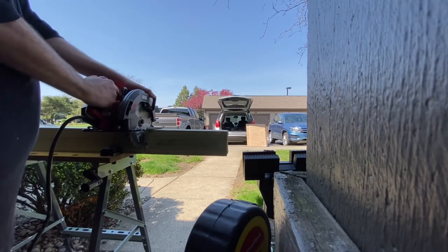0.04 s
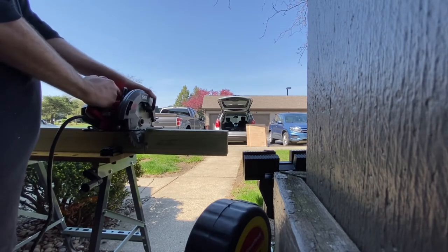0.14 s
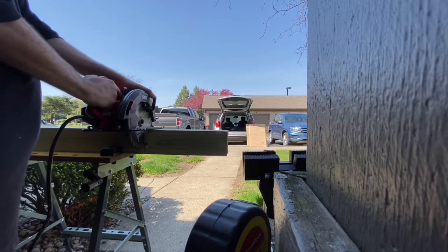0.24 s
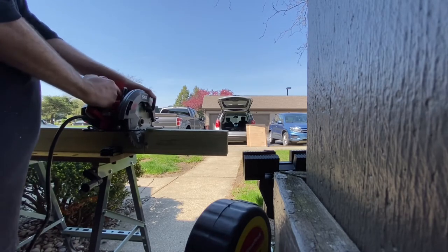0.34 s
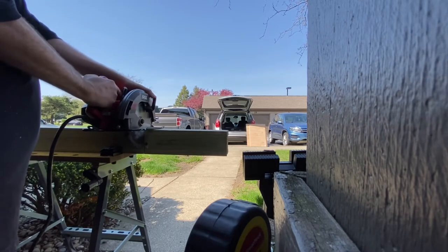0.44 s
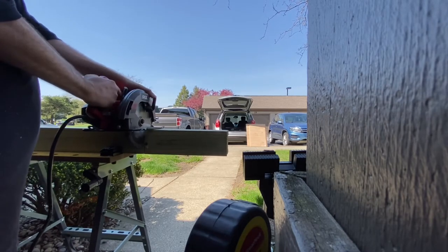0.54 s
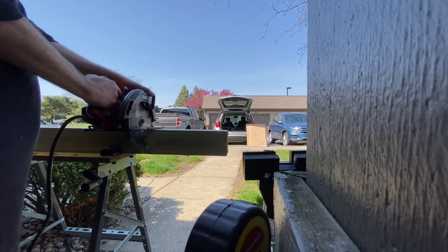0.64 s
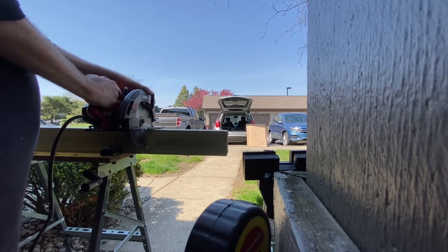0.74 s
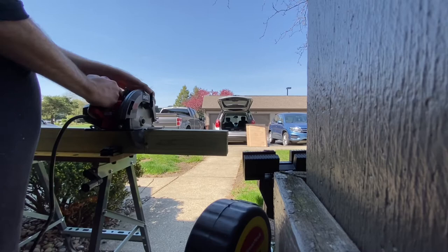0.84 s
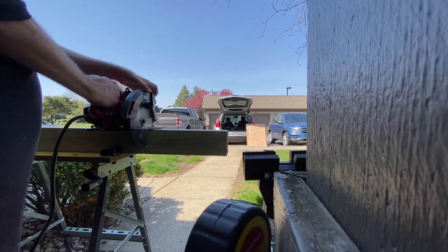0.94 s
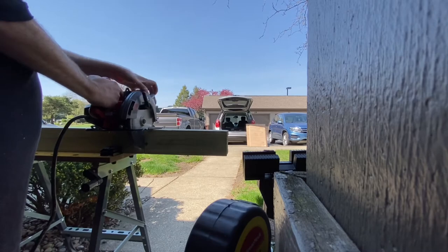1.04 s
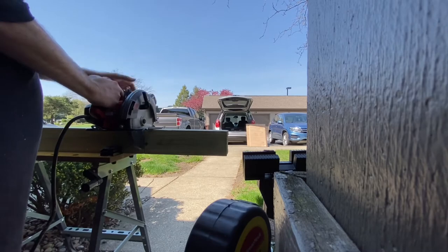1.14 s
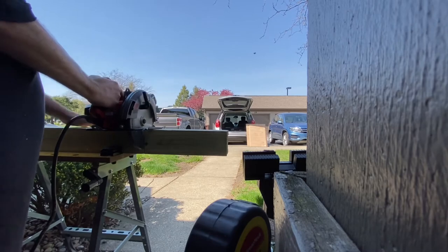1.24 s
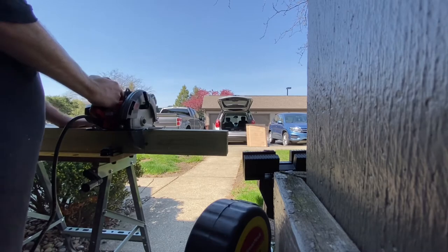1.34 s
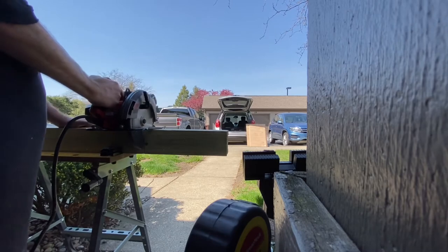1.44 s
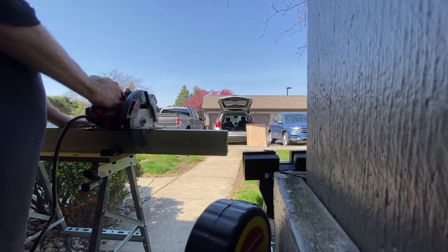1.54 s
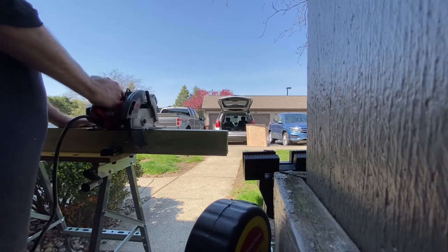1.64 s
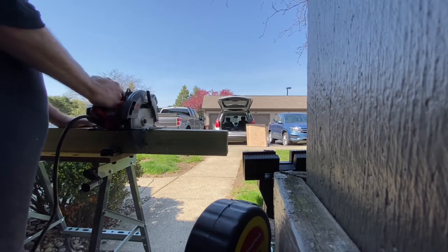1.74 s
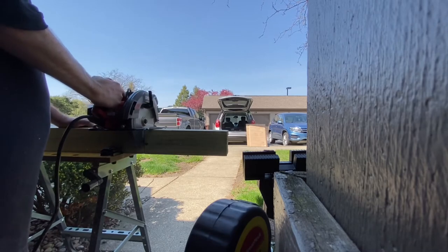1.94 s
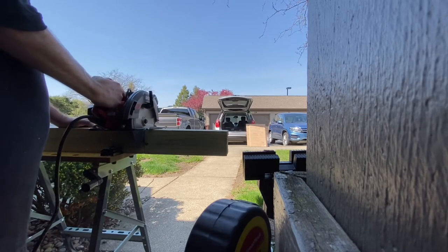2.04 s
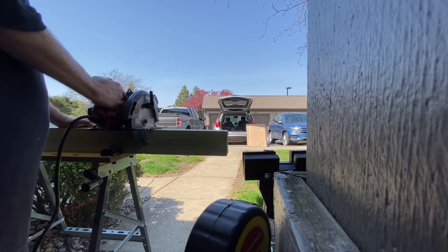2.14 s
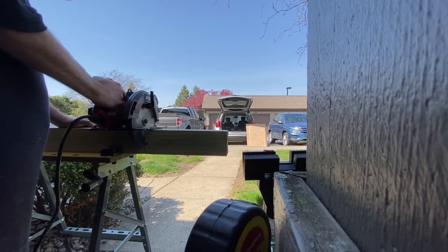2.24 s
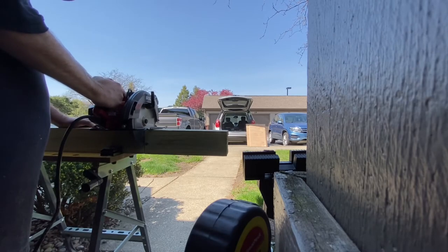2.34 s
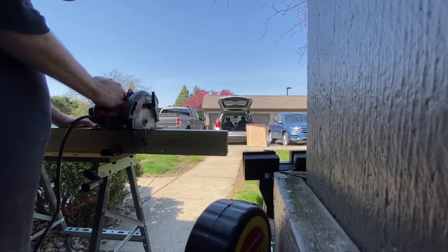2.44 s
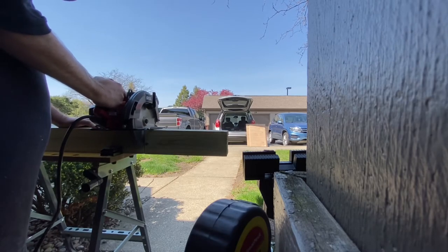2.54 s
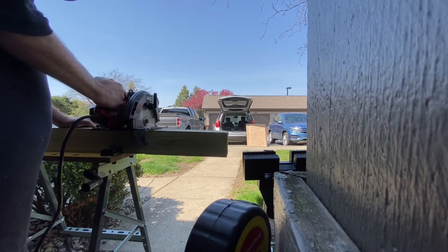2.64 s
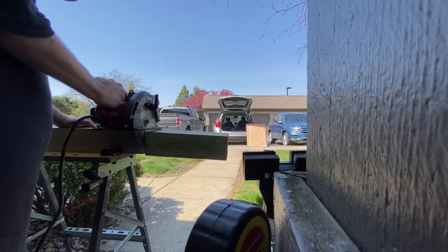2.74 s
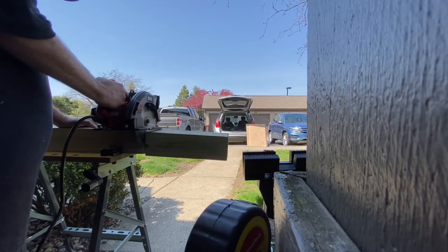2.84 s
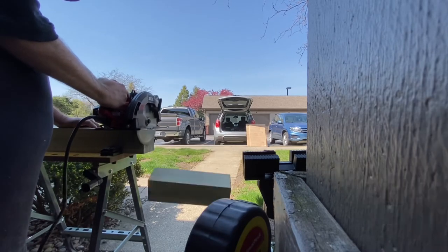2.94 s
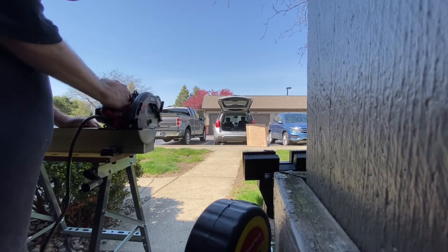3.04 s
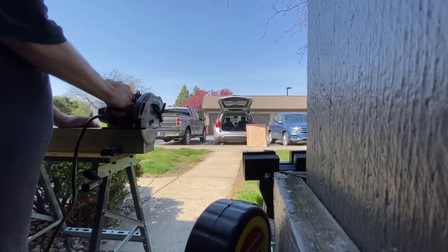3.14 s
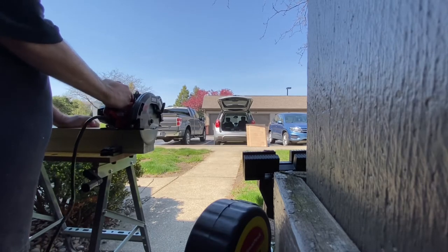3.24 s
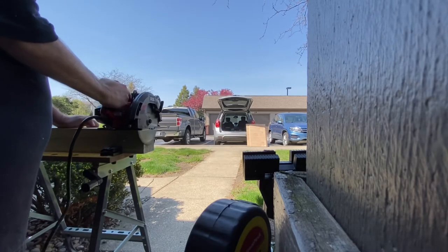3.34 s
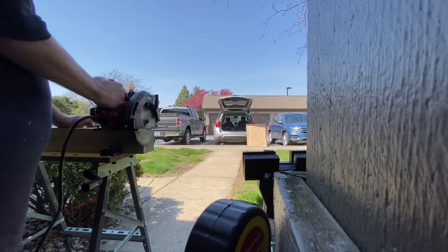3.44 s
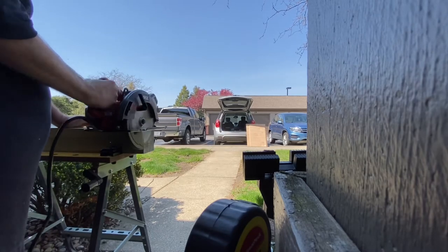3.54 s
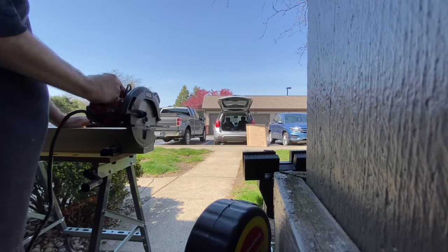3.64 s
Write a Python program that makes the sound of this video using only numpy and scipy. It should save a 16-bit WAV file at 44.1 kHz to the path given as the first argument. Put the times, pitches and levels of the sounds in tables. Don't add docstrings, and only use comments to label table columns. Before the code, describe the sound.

Close up outdoors, a corded circular saw runs up with a harsh rattle and hiss, bites steadily through wood, knocks as the piece drops, and coasts down with a falling whine over faint street noise.

```python
import sys
import numpy as np
from scipy import signal
from scipy.fft import rfft, irfft
from scipy.io import wavfile

SR = 44100
rng = np.random.default_rng(int(sys.argv[2]) if len(sys.argv) > 2 else 0)


def rack_gain(trim_db):
    fader = np.asarray(trim_db, float)
    return 10 ** (fader / 20)


def int16_out(signal):
    q = np.round(np.clip(np.atleast_2d(signal).T, -1, 1) * 32767)
    wavfile.write(sys.argv[1], SR, q.astype(np.int16))


N = 160965
TAIL = 4035
T = np.arange(N) / SR
HZ = np.maximum(np.fft.rfftfreq(N + TAIL, 1 / SR), 1)

# (time [s], frequency [Hz])
WHINE = [(.24, 3500), (.28, 6400), (.345, 10100), (.42, 11650), (.52, 12830), (.6, 13220), (.7, 13420),
         (1.12, 14490), (1.3, 14575), (1.43, 14500), (1.68, 13965), (2.64, 14110), (2.85, 14620),
         (2.96, 14750), (3.07, 12950), (3.23, 10650), (3.38, 9100), (3.65, 7050)]
COMMUTATOR_BARS, PINION_TEETH, GEAR_TEETH = 30, 7, 40
FULL_WHINE_HZ = 14000


def in_time(rows):
    s, *columns = np.transpose(rows)
    return [np.interp(T, s, c) for c in columns]


def at_hz(points):
    hz, *columns = np.transpose(points)
    return [np.interp(np.log(HZ), np.log(hz), c) for c in columns]


def shape(x, gain):
    return irfft(rfft(x, N + TAIL) * gain, N + TAIL)[..., :N]


def rms_one(x):
    return x / np.sqrt(np.mean(x ** 2) + 1e-20)


def drift(rate_hz):
    every = 40
    pole = np.exp(-2 * np.pi * every * rate_hz / SR)
    white = rng.standard_normal(N // every + 2002)
    slow = signal.lfilter([1], [1, -2 * pole, pole * pole], white)[2000:]
    return np.interp(np.arange(N) / every, np.arange(len(slow)), rms_one(slow))


def patchy(x, patch_db):
    together, out = drift(2.3), 0
    for octave in range(7, 15):
        band = np.cos(np.pi / 2 * np.clip(np.log2(HZ) - octave, -1, 1)) ** 2
        out = out + shape(x, band) * rack_gain(patch_db * (0.9 * together + drift(26.3)))
    return out


def street():
    # (frequency [Hz], level [dB])
    spectrum = [(24, -47), (40, -5), (221, -11), (401, -21.5), (693, -16), (1200, -18.5), (1610, -28.5),
                (2710, -31), (15000, -50.5)]
    # (frequency [Hz], left minus right [dB])
    balance = [(60, -7.5), (240, -3.5), (950, -2), (3770, -0.5), (15000, 6)]
    # (frequency [Hz], likeness [-1..1])
    coherence = [(60, 1), (240, 0.58), (950, -0.23), (3770, -0.055), (15000, 0.39)]
    # (time [s], level [dB])
    duck = [
        (0, 6),
        (.29, 4.5),
        (.4, -10.5),
        (.8, -12.5),
        (1.6, -17),
        (3.65, -14.5),
    ]
    alike, pan = np.clip(at_hz(coherence)[0], -1, 1), at_hz(balance)[0]
    noise = rms_one(shape(rng.standard_normal((2, N)), rack_gain(at_hz(spectrum)[0])))
    mid, side = patchy(noise, patch_db=2.0)
    mid, side = shape(mid, np.sqrt(1 + alike)), shape(side, np.sqrt(1 - alike))
    pair = np.array([shape(mid + side, rack_gain(pan / 2)), shape(mid - side, rack_gain(-pan / 2))])
    return rack_gain(-45 + in_time(duck)[0]) * pair


def engine():
    # (time [s], frequency [Hz], level [dB])
    course = [
        (1.15, 130, -77),
        (1.288, 128.6, -70),
        (2.578, 135.3, -71.5),
        (2.668, 132.3, -84),
        (2.69, 132.6, -57),
        (2.7, 132.5, -70),
    ]
    hz, db = in_time(course)
    fade_s = 0.059
    fade = np.clip(np.minimum(T - course[0][0], course[-1][0] - T) / fade_s, 0, 1)
    tone = np.sin(2 * np.pi * np.cumsum(hz) / SR)
    return fade * rack_gain(db + 14 + .5 * drift(4.7)) * tone * rack_gain([[-2.5], [2.5]])


def knocks():
    # (time [s], level [dB], frequency [Hz])
    hits = [
        (2.9419, -25, 400),
        (2.9415, -31, 850),
        (2.947, -37, 197),
        (2.984, -46, 180),
        (3.05, -40, 750),
    ]
    rise_s, hold_cycles, decay_cycles = .0003, 1.4, 3.5
    drop, drop_s, pan_db = 1.6, .0008, 2.5
    out = np.zeros(N)
    for s, db, hz in hits:
        age = np.maximum(T - s, 0)
        decay_db = 60 * np.maximum(age * hz - hold_cycles, 0) / decay_cycles
        bent_age = age + drop * drop_s * (1 - np.exp(-age / drop_s))
        out += rack_gain(db - decay_db) * np.minimum(age / rise_s, 1) * np.sin(2 * np.pi * hz * bent_age)
    return out * rack_gain([[-pan_db], [pan_db]])


def resonant_bursts(rows, width_hz):
    out, white = 0, rng.standard_normal((2, N))
    for hz in sorted({round(row[3]) for row in rows}):
        burst = sum(rack_gain(db) * np.exp(-((T - s) / length) ** 2)
                    for s, length, db, own in rows if round(own) == hz)
        b, a = signal.iirpeak(hz, hz / width_hz, SR)
        ringing = signal.lfilter(b, a, signal.lfilter(b, a, white))
        out = out + burst * rms_one(ringing)
    return out


def clashes():
    # (time [s], length [s], level [dB], frequency [Hz])
    hits = [(0.234, 0.0057, -24, 5570), (0.276, 0.023, -20, 2400), (0.291, 0.038, -23.5, 4770),
            (0.343, 0.04, -21.5, 2380), (0.348, 0.17, -22.5, 2940), (0.434, 0.058, -26.5, 2580),
            (2.874, 0.022, -34.5, 4840), (2.88, 0.014, -42, 1790), (3.149, .02, -40, 2420),
            (3.33, .015, -37, 3420), (3.371, 0.022, -36, 2420), (3.539, 0.006, -36, 2450)]
    return resonant_bursts(hits, width_hz=410)


def blade_rings():
    # (time [s], length [s], level [dB], frequency [Hz])
    modes = [(.275, .045, -32, 5780), (.32, 0.044, -36, 4770), (.47, .015, -30, 5760),
             (.66, 0.056, -38, 5370), (2.55, 0.067, -36.5, 2465), (2.72, 0.044, -42, 2600),
             (3.055, 0.013, -41, 2380), (3.16, .014, -37, 2466), (3.225, .02, -43, 2390),
             (3.39, .008, -38, 2460), (3.32, .01, -33, 5160), (3.64, .012, -41, 2490)]
    return resonant_bursts(modes, width_hz=70)


def rattle(level_db):
    # (frequency [Hz], level [dB])
    spectrum = [(150, -43.5), (400, -17), (800, -10), (1300, -4.5), (2500, -2.5), (3500, -1), (6000, -8.5),
                (14000, -18)]
    clicks_per_s = 9000
    clicks = (rng.random((2, N)) < clicks_per_s / SR) * rng.choice([-1, 1], (2, N))
    return rack_gain(level_db) * patchy(rms_one(shape(clicks, rack_gain(at_hz(spectrum)[0]))), patch_db=0.85)


def air(level_db):
    # (frequency [Hz], level [dB])
    spectrum = [(300, -31.5), (1000, -19.5), (3000, -7.5), (6000, -3), (9000, -0.5), (12000, 1),
                (14000, 4.5), (15700, -3.5)]
    top_hz, top_growth = 9100, 2.6
    hiss = patchy(rms_one(shape(rng.standard_normal((2, N)), rack_gain(at_hz(spectrum)[0]))), patch_db=0.92)
    top = shape(hiss, 1 / (1 + (top_hz / HZ) ** 8))
    speed = in_time(WHINE)[0] / FULL_WHINE_HZ
    snap = rack_gain(-31) * np.exp(-np.abs(T - .2335) / .005)
    return rack_gain(level_db) * (hiss + top * (speed ** top_growth - 1)) + snap * hiss


def order(turns, rate, multiple, db):
    flicker = rack_gain(db + 1.5 * drift(7))
    tone = np.sqrt(2) * np.sin(2 * np.pi * (multiple * turns + rng.random()))
    return flicker * tone * (multiple * rate < 16000)


def tooth_comb(blade_turns):
    cut_from_s, cut_to_s, cut_edge_s = .95, 2.75, .15
    turn, orders = np.arange(2048) / 2048, np.arange(20, 182, 2)
    sizes = rack_gain(-7 + 3 * rng.standard_normal(len(orders)))
    phases = rng.random((len(orders), 1))
    pattern = sizes @ np.sin(2 * np.pi * (orders[:, None] * turn + phases))
    cutting = np.clip(np.minimum(T - cut_from_s, cut_to_s - T) / cut_edge_s, 0, 1)
    return cutting * np.interp(blade_turns % 1, turn, pattern, period=1)


def songs(rattle_db, air_db, whine_db, bite_db):
    # (multiple of rotor rate, level over the rattle [dB])
    rotor_orders = [
        (4, -15),
        (6, -24),
    ]
    # (time [s], unbalance level over the rattle [dB], mesh level over the rattle [dB])
    unloaded = [(.3, -24, -10), (.42, -13, -4), (.62, -15, -4), (.72, -16, -20), (1.15, -16, -24),
                (1.6, -19, -24), (2.6, -19, -26), (2.78, -12, -24), (2.96, -15, -20), (3.12, -12, -15),
                (3.25, -26, -24)]
    # (multiple of blade rate, level [dB], middle [s], spread [s])
    blade_orders = [(27.8, -44.5, 1.4, 0.14), (32.55, -36.5, 1.36, 0.17), (40.5, -56, 1.3, 0.13),
                    (45.8, -40, 1.8, 0.36), (97.7, -34, 1.45, 0.3), (28.63, -65, 5.6, 1),
                    (38.6, -41.5, 2.14, 0.12), (64.3, -39.5, 1.69, 0.12), (168, -50, 1.6, .5),
                    (175, -43, 1.3, 0.95)]
    rotor_growth = 1.5
    whine_hz = in_time(WHINE)[0]
    rate = whine_hz / COMMUTATOR_BARS
    rotor = np.cumsum(rate) / SR
    blade = rotor * PINION_TEETH / GEAR_TEETH
    blade_rate = rate * PINION_TEETH / GEAR_TEETH

    wobble = np.cumsum(18 * drift(60)) / SR / COMMUTATOR_BARS
    whine_level_db = air_db + whine_db + 1.5 * drift(30)
    whine = order(rotor + wobble, rate, COMMUTATOR_BARS, whine_level_db)

    shaft = 0
    for k, db in rotor_orders:
        growth = (whine_hz / FULL_WHINE_HZ) ** (rotor_growth * (k < PINION_TEETH))
        shaft = shaft + growth * order(rotor, rate, k, db)
    for k, db in zip((2, 2 * PINION_TEETH), in_time(unloaded)):
        shaft = shaft + order(rotor, rate, k, db)

    passing = 0
    for k, db, s, spread in blade_orders:
        passing = passing + np.exp(-((T - s) / spread) ** 2) * order(blade, blade_rate, k, db)
    return whine + rack_gain(rattle_db) * shaft + passing + rack_gain(air_db + bite_db) * tooth_comb(blade)


def echoes():
    first_s, last_s, loss_db = .004, .06, 6
    late = rng.random(12)
    lag_s = first_s + late * (last_s - first_s)
    return 1 + rack_gain(-24 - loss_db * late) @ np.exp(-2j * np.pi * lag_s[:, None] * HZ)


def ears(same, other):
    # (frequency [Hz], width [Hz], level [dB])
    left_ear = [(390.0, 200.0, -5.7), (740.0, 80.0, 2.0), (1210.0, 160.0, 4.4), (1590.0, 340.0, -8.9),
                (1930.0, 950.0, 13.7), (2080.0, 270.0, -14.0), (3390.0, 320.0, 3.2), (3690.0, 250.0, -4.2),
                (4510.0, 560.0, -2.8), (5750.0, 1230.0, -14.0), (5840.0, 1680.0, 11.7),
                (10650.0, 1890.0, 2.9), (12770.0, 1050.0, -4.2)]
    right_ear = [(350.0, 60.0, -4.0), (640.0, 100.0, 2.3), (830.0, 110.0, -1.6), (1480.0, 200.0, 9.4),
                 (1640.0, 910.0, -6.8), (1890.0, 190.0, 7.2), (2430.0, 200.0, 3.9), (3280.0, 690.0, -12.2),
                 (3310.0, 420.0, 14.0), (4030.0, 530.0, 2.9), (5530.0, 380.0, -2.4), (12790.0, 940.0, -3.6),
                 (15060.0, 760.0, -4.7)]
    # (frequency [Hz], width [Hz], level [dB])
    plate = [(1050, 17, 1.5), (1256, 45, 3), (1820, 270, 1), (2455, 20, 1), (2680, 17, 3.5),
             (3290, 154, -6), (3550, 15, 5.5), (4770, 36, 4.5), (5250, 32, 1), (6580, 81, 6.5),
             (7140, 65, 4.5), (7390, 65, -7), (7800, 60, -1), (10130, 80, 6)]
    # (frequency [Hz], left-right likeness [0..1], lag of the right ear [rad])
    coherence = [(150, .85, 0), (800, .9, 1.95), (1250, .45, 2.85), (1900, .65, 2.8), (2700, .4, 4.6),
                 (3900, .82, 3.2), (7000, .3, 8.5), (12200, .1, 13)]

    def colour(modes):
        return rack_gain(sum(db / (1 + (2 * (HZ - hz) / wide) ** 2) for hz, wide, db in modes))

    alike, lag = at_hz(coherence)
    alike, yard = np.clip(alike, 0, 1), echoes()
    mid = shape(same, np.sqrt((1 + alike) / 2))
    side = shape(other, np.sqrt((1 - alike) / 2))
    left = shape(mid + side, colour(left_ear + plate) * yard)
    right = shape(mid - side, colour(right_ear + plate) * yard * np.exp(-1j * lag))
    return np.array([left, right])


def scene():
    # (time [s], gear rattle [dB], air and sawdust [dB], whine over the air [dB], bite of teeth over the air [dB])
    effort = [(0.23, -36.5, -39, -10, -30), (0.27, -25, -40, -10, -18), (0.29, -25, -16, -11, -13.5),
              (0.46, -26.5, -19, -10.5, -9), (0.47, -30.5, -21, -6, -11), (0.54, -29, -20.5, -2, -10.5),
              (0.85, -31.5, -28, -17, -49), (1.43, -30, -25.5, -2, -11.5), (1.57, -34, -28, -6, -16),
              (2.09, -35, -28, -13, -38), (2.56, -34.5, -28, -6, -14.5), (2.98, -35, -28, -9, 0),
              (3.1, -38.5, -31.5, -6, -23), (3.15, -37, -28.5, -18, -16), (3.26, -42, -32, -15, -23),
              (3.39, -38.5, -30.5, -3.5, -13), (3.45, -40, -36, -2, -24), (3.65, -42, -39, 0, -20)]
    rattle_db, air_db, whine_db, bite_db = in_time(effort)
    on = np.clip((T - .2335) / .0008, 0, 1)
    same, other = on * (rattle(rattle_db + 6) + air(air_db) + clashes() + blade_rings())
    tones = on * songs(rattle_db, air_db, whine_db, bite_db)
    return ears(same + tones, other + 0.48 * tones) + knocks() + street() + engine()


def band_limit(x):
    return signal.sosfilt(signal.butter(12, 15750, fs=SR, output="sos"), x)


def record(dry):
    peak_top, low_cut_hz, cutoff_hz = .75, 50, 15750
    mono_from_hz, mono_to_hz = 12350, 14000
    dry = peak_top * np.tanh(dry / peak_top)
    below = (HZ < cutoff_hz) / (1 - 1j * low_cut_hz / HZ) ** 2
    stereo = (HZ < mono_from_hz) | (HZ > mono_to_hz)
    mid = shape(dry[0] + dry[1], below / 2)
    side = shape(dry[0] - dry[1], below * stereo / 2)
    return band_limit(np.array([mid + side, mid - side]))


dry = scene()
out = record(dry)
int16_out(out)
```